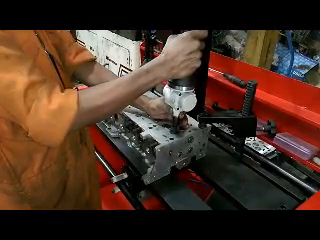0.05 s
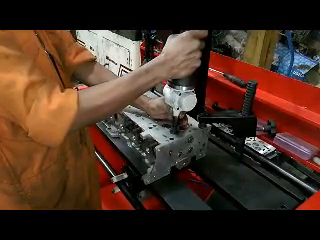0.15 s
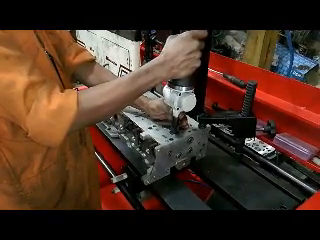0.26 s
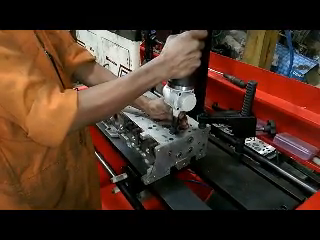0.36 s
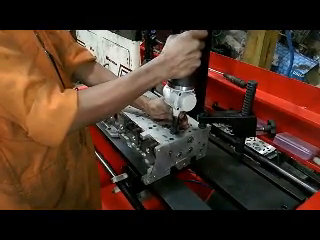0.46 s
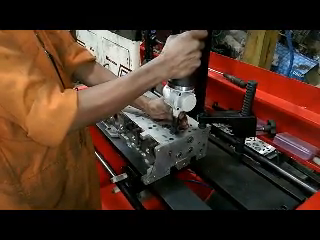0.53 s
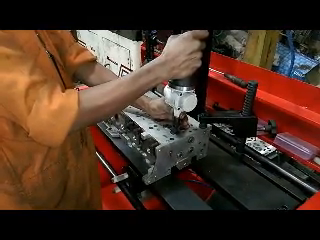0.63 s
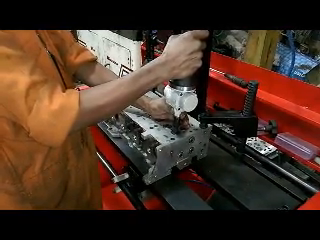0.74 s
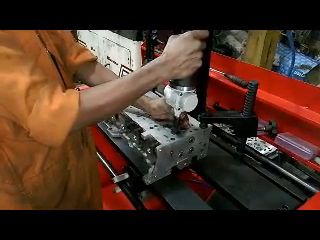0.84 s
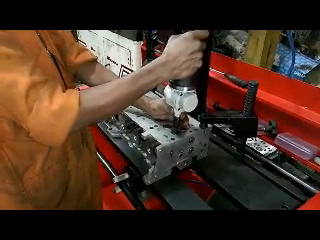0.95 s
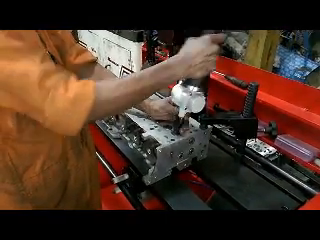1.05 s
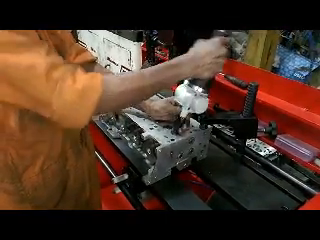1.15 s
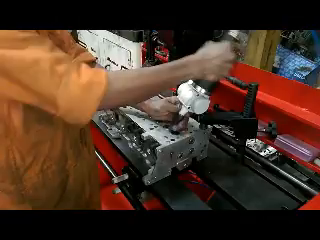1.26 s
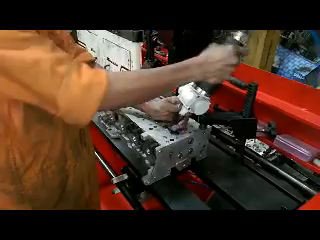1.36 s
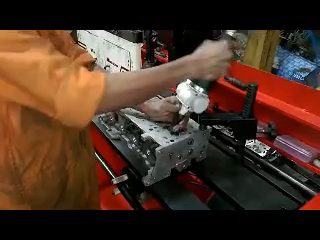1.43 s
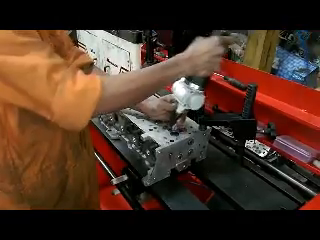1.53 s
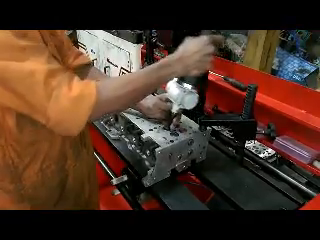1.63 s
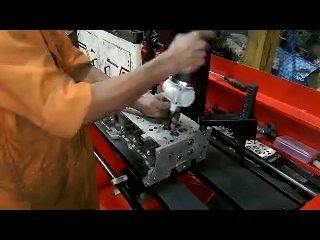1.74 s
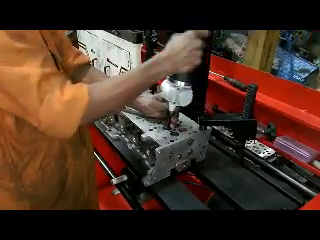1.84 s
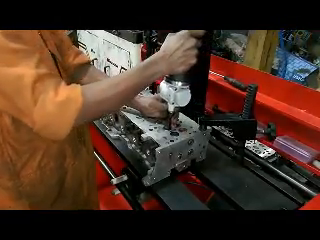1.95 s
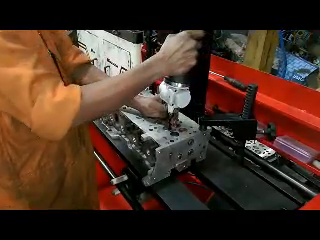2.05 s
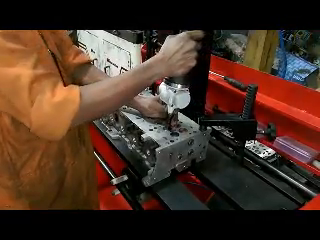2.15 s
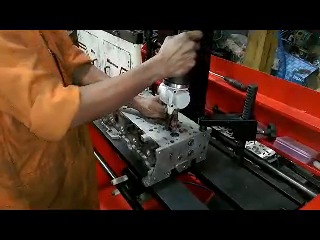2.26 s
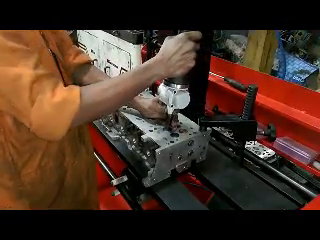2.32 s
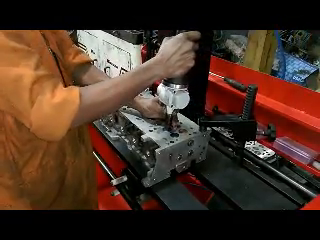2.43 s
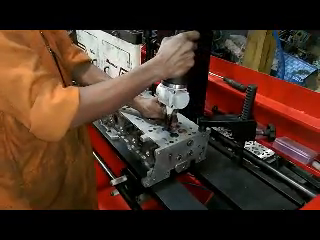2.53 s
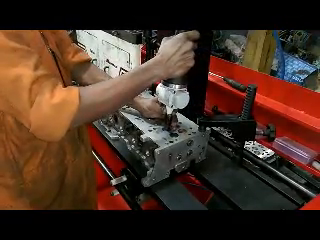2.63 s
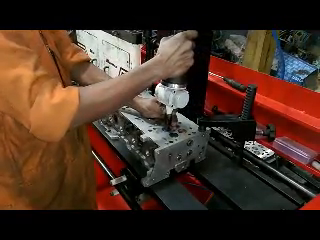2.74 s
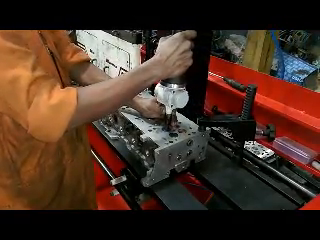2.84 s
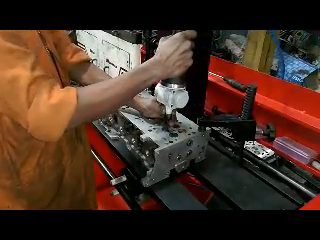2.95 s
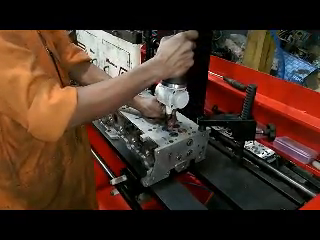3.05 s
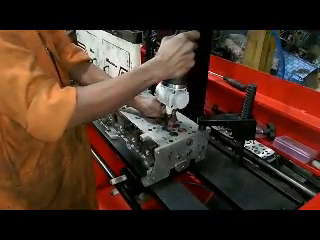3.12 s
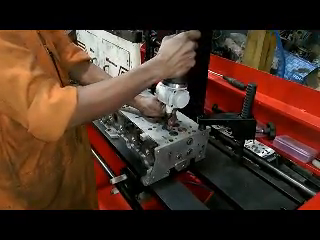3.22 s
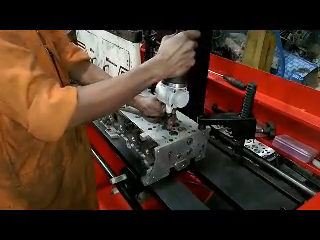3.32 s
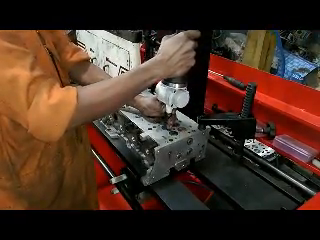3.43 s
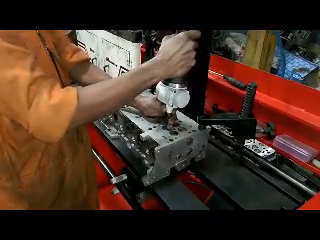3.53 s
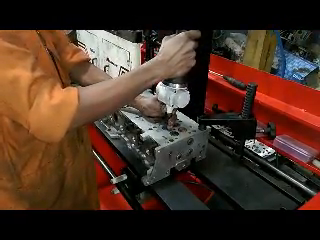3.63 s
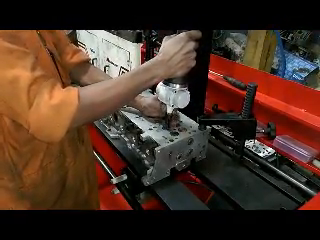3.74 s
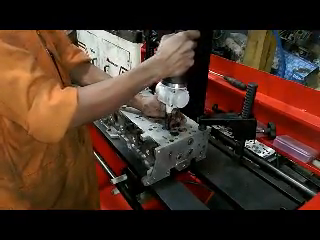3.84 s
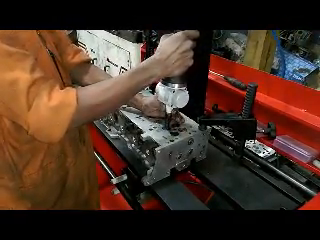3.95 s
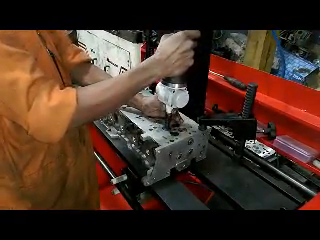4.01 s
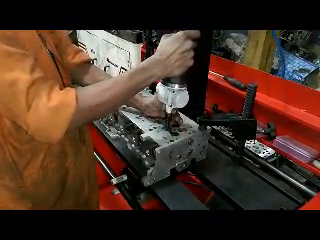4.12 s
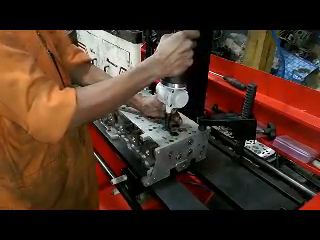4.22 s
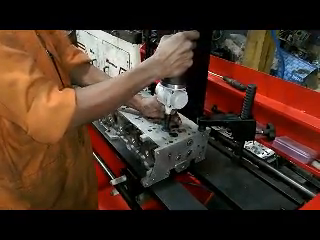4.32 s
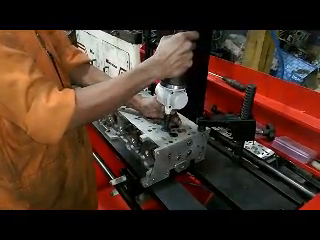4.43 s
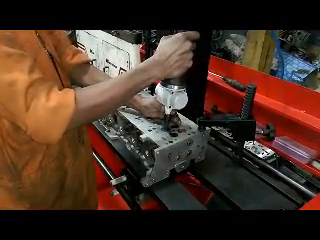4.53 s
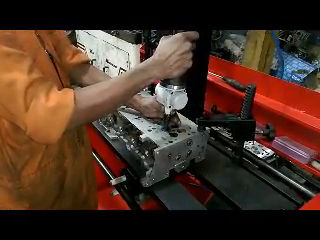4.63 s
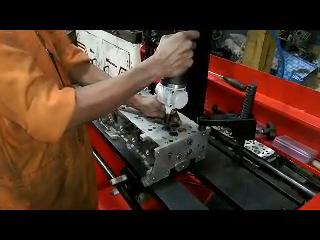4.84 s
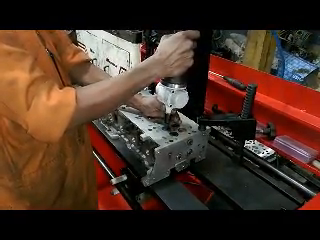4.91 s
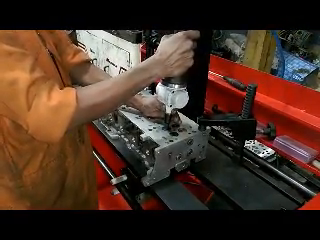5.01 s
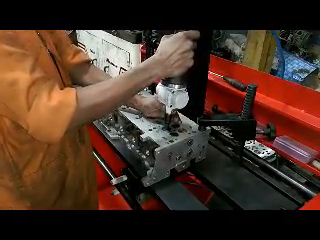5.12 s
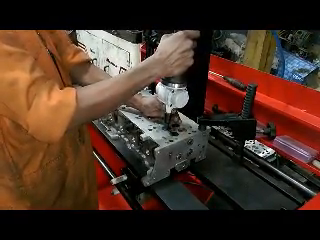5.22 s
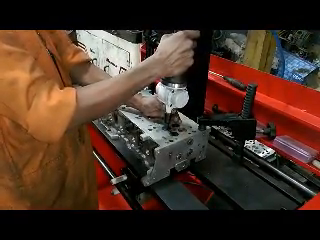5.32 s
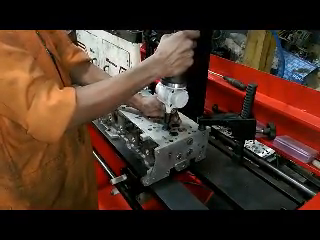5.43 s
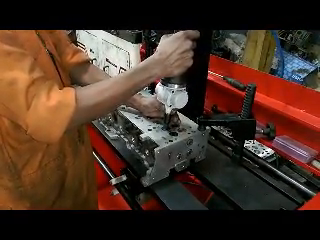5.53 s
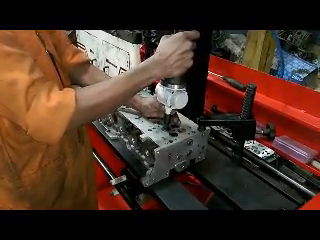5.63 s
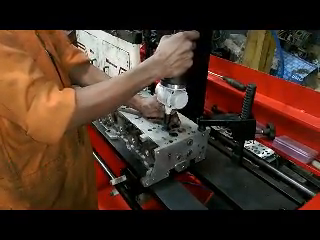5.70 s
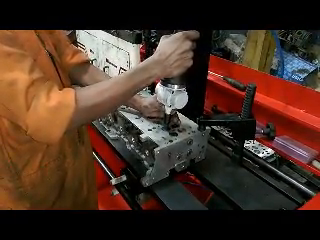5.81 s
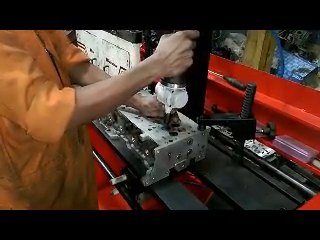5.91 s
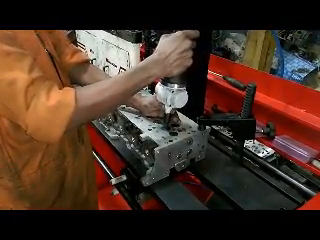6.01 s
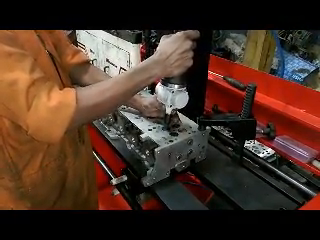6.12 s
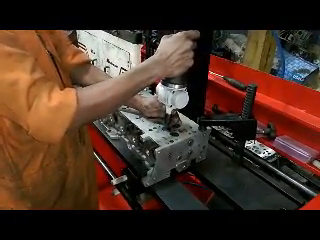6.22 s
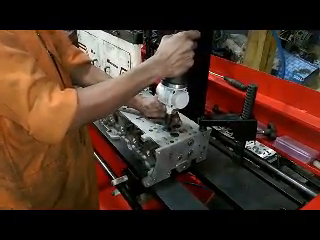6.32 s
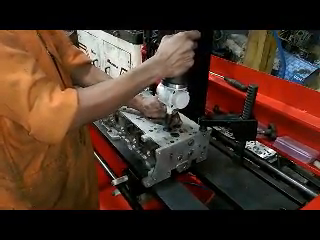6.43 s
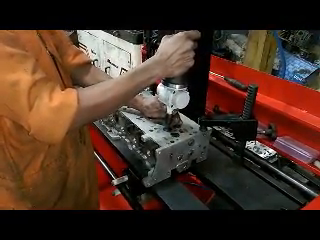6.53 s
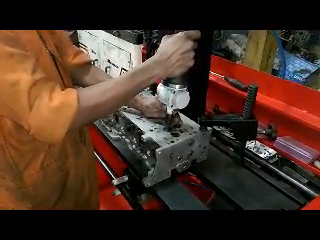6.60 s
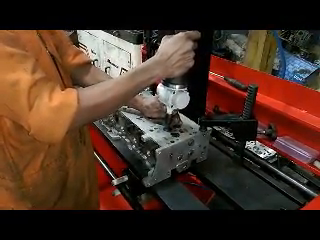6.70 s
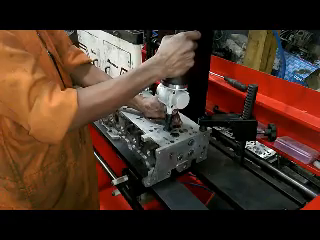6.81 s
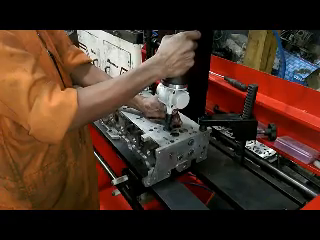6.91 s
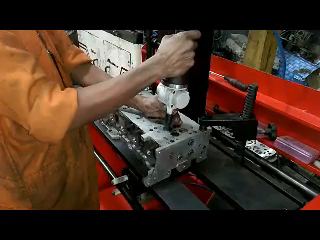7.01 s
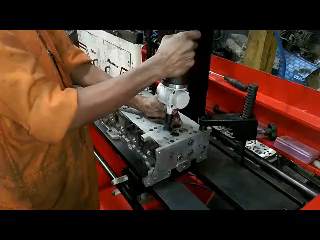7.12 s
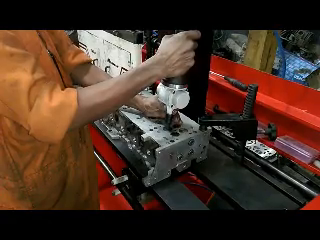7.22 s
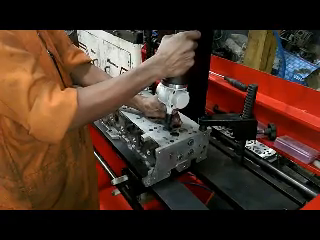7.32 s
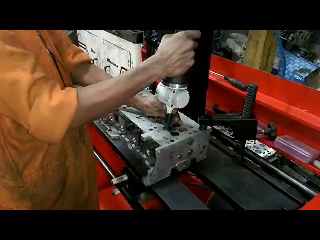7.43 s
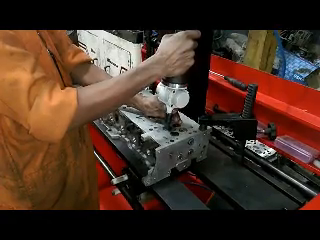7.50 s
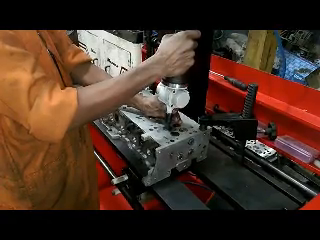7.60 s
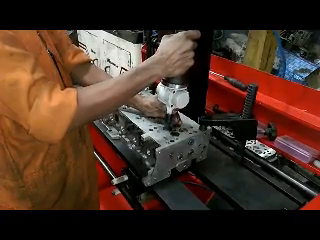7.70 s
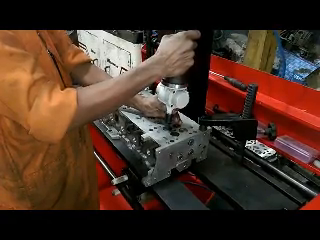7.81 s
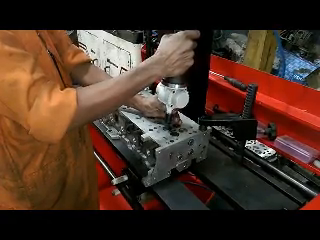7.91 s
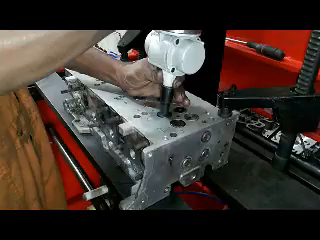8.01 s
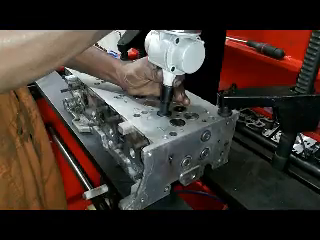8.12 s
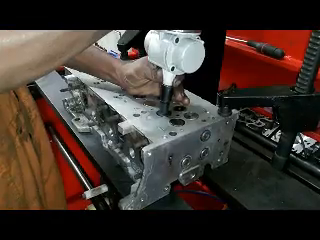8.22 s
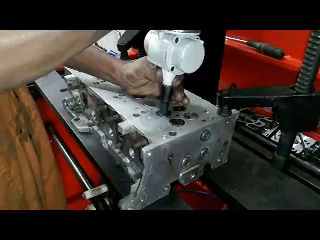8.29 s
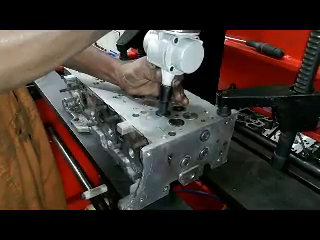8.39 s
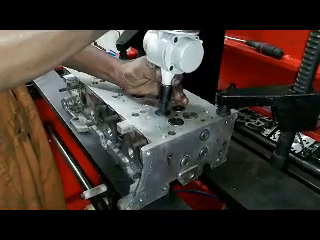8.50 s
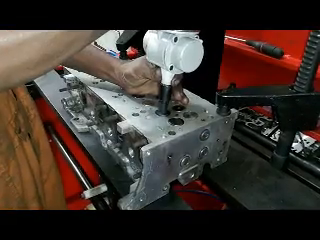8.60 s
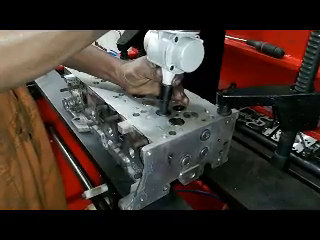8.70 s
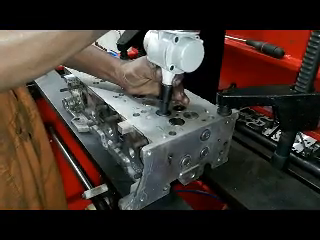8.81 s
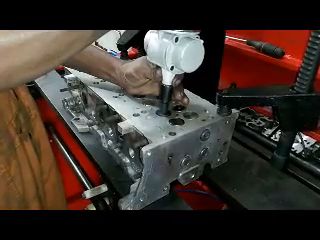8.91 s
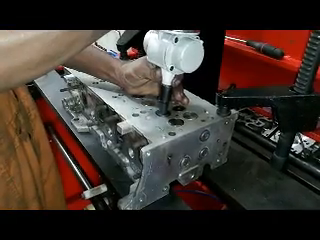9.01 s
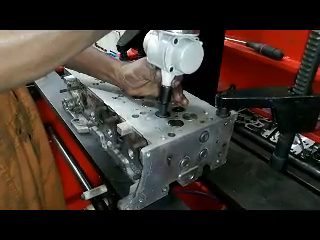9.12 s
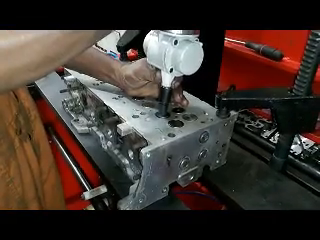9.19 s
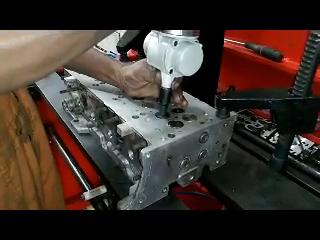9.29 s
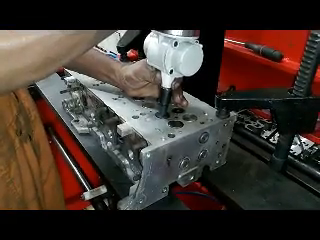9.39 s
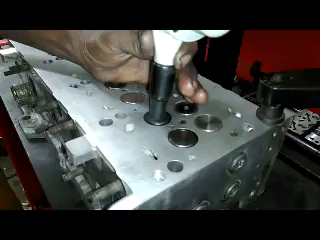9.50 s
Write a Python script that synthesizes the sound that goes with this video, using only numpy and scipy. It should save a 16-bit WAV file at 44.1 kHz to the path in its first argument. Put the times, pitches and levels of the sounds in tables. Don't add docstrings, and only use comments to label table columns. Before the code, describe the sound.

In a workshop, a motor tool rocks a valve on its seat with rapid, ringing metal rattle and gritty grinding. It soon stops; a switch clicks close by and sheet metal clatters in the distance over fan noise and motor hum. Low draughts flutter on the microphone as the tool starts again about an arm's length away, running to the end with a closer, slightly changed ring.

```python
import sys
import numpy as np
from scipy import signal
from scipy.fft import rfft, irfft, next_fast_len
from scipy.io import wavfile
from scipy.ndimage import uniform_filter1d

SR = 44100
rng = np.random.default_rng(int(sys.argv[2]) if len(sys.argv) > 2 else 0)


def wrap_up_sound(samples):
    columns = np.atleast_2d(samples).T
    tamed = np.clip(columns, -1, 1)
    steps = np.round(tamed * 32767).astype(np.int16)
    wavfile.write(sys.argv[1], SR, steps)


def linear_from_db(decibels):
    return 10 ** (np.asarray(decibels, float) / 20)


N = 421155
TIME = np.arange(N) / SR
MOTOR_START_S = 4.41
PASTE_BITES_S = 0.089


def level(x, db):
    return x * linear_from_db(db) / np.sqrt(np.mean(x ** 2))


def colour(x, points):
    size = next_fast_len(x.shape[-1])
    hz, db = np.transpose(points)
    log_hz = np.log(np.fft.rfftfreq(size, 1 / SR) + 1)
    gain = linear_from_db(np.interp(log_hz, np.log(hz), db, left=-80, right=-80))
    return irfft(rfft(x, size) * gain, size)[..., :x.shape[-1]]


def walk(rate):
    k = int(SR / rate)
    held = np.repeat(rng.standard_normal(N // k + 1), k)
    return 1.63 * uniform_filter1d(uniform_filter1d(held, k), k)[:N]


def pair(alike_hz, size=N):
    mid, side = rng.standard_normal((2, size))
    side = signal.lfilter(*signal.butter(1, alike_hz, "high", fs=SR), side)
    return mid + np.array([side, -side])


def modes(hz, width_hz, size):
    t = np.arange(size) / SR
    decay = np.exp(-np.pi * np.c_[width_hz] * t)
    return np.c_[width_hz] / 1000 * decay * np.sin(2 * np.pi * np.c_[hz] * t)


def struck(table, t):
    return sum(linear_from_db(db) * np.exp(-np.pi * w * t) * np.sin(2 * np.pi * hz * t) for hz, w, db in table)


def add(out, sound, s):
    i = max(int(round(s * SR)), 0)
    out[..., i:i + sound.shape[-1]] += sound[..., :N - i]


# pitch [Hz], level [dB per Hz]
SHOP_COLOUR = [(20, -12), (40, -12.5), (80, -3), (190, -10), (380, -10), (500, -14.5), (640, -8.5),
               (1200, -11.5), (1600, -7.5), (2100, -8), (3000, -13.5), (4500, -21), (8000, -28.5),
               (15800, -43)]
# pitch [Hz], level [dB]
HUM = [(86, -69), (301.5, -74), (377, -69.5), (441.4, -74), (630, -67), (694.4, -68), (759, -72),
       (1012, -68.5), (1109, -74)]
# pitch [Hz], start [s], end [s], level [dB]
WHISTLE = (3268, 3.15, 3.62, -65.5)


def shop():
    noise = 0
    for hz in 45 * 4. ** np.arange(5):
        octave = [(hz / 4, -40), (hz / 2, -3), (hz / 1.5, 0), (hz * 1.5, 0), (hz * 2, -3), (hz * 4, -40)]
        noise = noise + colour(pair(680.0), octave) * linear_from_db(.25 * walk(2.45) + 0.7 * walk(12))
    fan = signal.lfilter(*signal.butter(2, 1300, "high", fs=SR), rng.standard_normal(N)) * linear_from_db(-5)
    noise = noise + np.array([fan, np.roll(fan, 18)])
    lines = sum(linear_from_db(db + 1.2 * walk(8)) * np.sin(2 * np.pi * (hz * TIME + rng.random())) for hz, db in HUM)
    hz, start, end, db = WHISTLE
    swell = np.sin(np.pi * np.clip((TIME - start) / (end - start), 0, 1))
    lines = lines + linear_from_db(db) * swell * np.sin(2 * np.pi * hz * TIME)
    return level(colour(noise, SHOP_COLOUR), -50.5) + linear_from_db(1.5) * lines


# start [s], end [s], left level [dB], right level [dB]
GUSTS = [
    (4.206, 4.505, -51.5, -59),
    (4.5, 5.15, -57.5, -58),
    (5.162, 5.682, -47.5, -62),
    (5.726, 6.19, -50, -65),
    (6.297, 7.16, -66, -65),
    (7.197, 7.454, -51, -63),
    (7.455, 7.934, -61, -57),
]
# centre [s], left level [dB], length [ms], right level [dB], throb [Hz]
POPS = [(4.21, -55, 24, -58, 70), (4.275, -44, 30, -44, 100), (4.325, -40, 25, -50, 90),
        (4.378, -26.5, 17, -50, 156), (4.41, -38, 18, -56, 60), (4.454, -45, 25, -60, 130),
        (4.544, -47, 39, -62, 70), (4.673, -50, 35, -47, 151), (5.035, -36.5, 20, -56, 90),
        (5.2, -55, 31, -59, 60), (5.273, -45, 22, -59, 141), (5.405, -39, 26, -62, 110),
        (5.485, -34, 28, -58, 80), (5.525, -36.5, 36, -58, 150), (5.588, -48, 30, -58, 100),
        (5.635, -46, 18, -58, 151), (5.738, -46, 27, -59, 100), (5.95, -50, 20, -60, 70),
        (6.059, -35.5, 27, -59, 100), (6.092, -45, 15, -59, 140), (6.846, -56, 22, -59, 80),
        (6.927, -55, 44, -53, 80), (7.327, -37, 29, -60, 65), (7.409, -44, 45, -60, 100),
        (7.487, -47, 30, -58, 90), (7.616, -40, 32, -59, 151), (7.763, -50, 36, -57, 90)]


def draught():
    gusts = sum(np.c_[linear_from_db(db)] * ((TIME > a) & (TIME < b)) for a, b, *db in GUSTS)
    gusts = uniform_filter1d(gusts, int(0.11 * SR))
    rumble = [(25, -13), (45, -2.0), (100, -3.0), (180, -8), (350, -16), (700, -51)]
    eddies = level(colour(rng.standard_normal((2, N)), rumble), 0)
    out = eddies * gusts * linear_from_db([3.9 * walk(25), 2.5 * walk(20)])
    for s, left_db, ms, right_db, hz in POPS:
        at, half = int(s * SR), int(ms * SR / 1000)
        throb = linear_from_db(-2) * np.cos(2 * np.pi * hz * (TIME[:2 * half] - half / SR))
        pop = (eddies[:, at - half:at + half] + throb) * np.hanning(2 * half)
        gain = linear_from_db(np.c_[[left_db - 3.0, right_db - 8.0]])
        out[:, at - half:at + half] += pop / pop.std(axis=1)[:, None] * gain
    return out


# start [s], peak [dB], colour centre [Hz], t60 [s], drum level [dB]
CLATTER = [(1.293, -38.5, 2060, 0.36, -75), (1.322, -37, 1850, 0.43, -65), (1.334, -32.5, 1200, 0.11, -75),
           (1.346, -57, 1300, 0.14, -55), (1.362, -46, 900, 0.27, -62), (1.484, -39, 2020, 0.24, -58),
           (1.492, -50, 1820, 0.79, -76), (1.630, -28, 2320, 0.24, -36), (1.668, -48, 1900, 0.98, -65),
           (1.788, -36.5, 1750, 0.62, -37), (1.808, -33.5, 1400, 0.13, -37), (1.828, -50, 1100, 0.15, -67),
           (1.871, -33.5, 1100, 0.32, -50), (1.910, -36, 1700, 0.34, -60),
           (1.945, -40.5, 2200, 0.14, -49.5), (2.012, -44, 1800, 0.33, -56)]
# [dB, dB, dB, dB]
SHEET = [(554, 12, -8, 3, -8, 3.5), (790, 21, 5.5, 1, 0, 8), (896, 16, -8, -10, 8, -5),
         (1044, 12, -13, -15, 15, -7), (1189, 14, 7, 4, -4, 5), (1330, 21, -11, 3, 2, -2),
         (1576, 24, 1, -17, 6, -4), (1774, 29, 0, -5, -8, 0), (1930, 34, 2, 5, -4, 4.5),
         (2060, 49, 0, 3, 3, 1), (2310, 74, -1, 3.5, 3, -3), (2810, 79, -4, -2, -5, -4),
         (3080, 30, -4, -2, -6, -2), (3600, 1800, -8, -7, -7, -13)]
BOUTS_S = [1.6, 1.75, 1.86]
# pitch [Hz], width [Hz], level [dB]
DRUM = [(293, 5, -5), (333, 6, 4)]


def clatter():
    out, t = np.zeros((2, N)), np.arange(14000) / SR
    hz, width, *bouts_db = np.transpose(SHEET)
    for s, peak_db, centre_hz, t60, drum_db in CLATTER:
        smear = pair(900, len(t)) * linear_from_db(-60 * t / t60) * np.minimum(t / 0.00056, 1)
        db = bouts_db[np.searchsorted(BOUTS_S, s)]
        bright_db = 2.5 * max(peak_db + 32.5, 0)
        broad = [(150, -20), (250, -10), (centre_hz / 2, -6), (centre_hz, 0), (2.65 * centre_hz, -8),
                 (4600, -13), (9000, -23.5 + bright_db), (15000, -51 + bright_db)]
        ring = linear_from_db(db + 1.5 * rng.standard_normal(len(hz))) @ modes(hz, width + 4, size=3000)
        rung = signal.fftconvolve(smear, ring[None], axes=1)[:, :len(t)]
        sound = colour(smear / np.std(smear) + linear_from_db(-1.5) * rung / np.std(rung), broad)
        add(out, sound * linear_from_db(peak_db) / np.std(sound[:, :600]), s)
        add(out, linear_from_db(drum_db) * struck(DRUM, t) * np.minimum(t / 0.055, 1), s)
    return out


# pitch [Hz], width [Hz], level [dB]
SWITCH = [(1100, 450, -20), (2650, 340, -21), (3500, 510, -15.5), (6800, 590, -15.5), (7800, 1200, -33)]


def switch():
    out, t = np.zeros((2, N)), np.arange(8000) / SR
    snap = struck(SWITCH, t) * np.minimum(t / 0.00038, 1)
    bright = [(4500, -20), (6200, 3), (7500, 8), (9000, -12), (11000, -32)]
    tail = colour(rng.standard_normal((2, len(t))), bright)
    add(out, snap + linear_from_db(-41.5) * linear_from_db(-60 * t / 0.39) * tail, 1.3708)
    return out


# time [s], level [dB]
THRUM = [(0, -63.5), (1.2, -62.5), (7.9, -67.5), (8.1, -63.5), (8.6, -60.5), (9.55, -55.5)]


def bench_thrum():
    low = [(90, -15), (150, 2.0), (230, -5.0), (330, -8)]
    return level(colour(pair(510.0), low), 0) * linear_from_db(np.interp(TIME, *np.transpose(THRUM)))


# pitch [Hz], level [dB per Hz]
GRIND = [(150, -32), (250, -12), (386, -7), (476, -14), (651, -11.5), (971, -4), (1640, -3.5), (2130, -4),
         (2910, -3), (3230, -1.5), (4260, -11), (13400, -27.5), (16000, -30)]


def paste():
    grit = (rng.random(N) < 70 / SR) * rng.exponential(size=N)
    grit = signal.lfilter([1], [1, -.985], grit)
    rub = pair(810.0) * (linear_from_db(1.83 * walk(90)) + linear_from_db(-11.0) * grit)
    since = TIME - MOTOR_START_S
    bite = np.where(since > -.1, 1 - 0.64 * np.exp(-np.maximum(since, 0) / PASTE_BITES_S), 1)
    return level(colour(rub, GRIND), -38) * bite


# time [s], position [crank turns]
CRANK = [
    [(0.0165, -.5), (0.2491, 3), (1.1653, 17)],
    [(4.4160, -.5), (4.5292, 1), (4.5981, 2), (5.0316, 8.5), (6.0169, 23.5), (6.4796, 30.5), (6.5817, 32),
     (6.9099, 37), (7.6611, 48.5), (7.9583, 53)],
    [(7.9762, -.5), (8.0167, 0), (8.8344, 12.5), (9.1922, 18), (9.523, 23)],
]
# forward late [ms], back late [ms], forward blow [dB], back blow [dB]
STROKES = [
    (0.0, -.6, -22.5, -24),
    (-.5, .75, -23.5, -25),
    (-0.59, 1.7, -22.5, -24.5),
]


def strokes(back):
    events = []
    for crank, (*late_ms, forward_db, back_db) in zip(CRANK, STROKES):
        s, turns = np.transpose(crank)
        at = np.interp(np.arange(turns[-1] + 1) - back / 2, turns, s)
        late_chance, blow_chance = rng.standard_normal((2, len(at)))
        db = (forward_db, back_db)[back] - 4 * (abs(at - 7.97) < .02) + .7 * blow_chance
        events += zip(at + (late_ms[back] + .3 * late_chance) / 1000, db)
    return events


# time from the main contact [ms], cylinder head level [dB], tool housing level [dB]
FORWARD_TRAIN = [
    [(-2, -3, -15), (0.42, 5.5, 1), (1.55, -9, -7), (3, -4.5, -7.5), (5.5, -3.5, -14), (10, -22, -23),
     (12, -17, -13.5)],
    [(-3.5, -6.5, -22), (-0.06, 4, -2), (1.13, -12, -1), (4, -4.5, -8), (5.5, -4, -12), (7, -7, -19),
     (11.5, -16, -19.5)],
    [(-1.5, -3.5, -21), (0.17, 1.5, -3.5), (1.7, -5.5, -3.5), (4, -6.5, -3), (5.5, -5, -21), (6, -3.5, -13),
     (5, -19, -34)],
]
BACK_TRAIN = [
    [(-1.5, -4.5, -12), (0.6, 3.5, -3), (1.2, -14, -1.5), (3.5, 0.5, -2.5), (5, -7, -14), (6.5, -9, -11),
     (10.5, -10, -6)],
    [(-2.3, -4.5, -8), (0.63, 5, -3), (0.8, -16, -17), (1.5, -1.5, -2.5), (4.5, -36, -4), (8, -16, -7.5),
     (10, -13.5, -11)],
    [(-2, 0, -4.5), (0, 4.5, -2), (2.5, -8, -2.5), (4, -3, -2), (4, -14, -11.5), (11, -24, -21),
     (5.5, -5, -18)],
]
# pitch [Hz], width [Hz], forward level [dB], back level [dB], left minus right [dB]
FIRST_RING = [(395, 57, -4, -2.5, -5.5), (685, 95, 6, -2, -0.5), (785, 55, -7, 0.5, -4),
              (866, 72, 0, -0.5, 1), (1047, 53, -4, -3, 5), (1167, 130, 2, 3.5, -2),
              (1525, 260, -2, -1.5, 2.5), (1860, 190, -0.5, 0.5, 7), (2444, 420, 2.5, 5.5, 8),
              (3196, 95, 8, 0, 22.5), (3700, 480, -2.5, -4.5, -11), (4570, 430, -14.5, -27, -10),
              (5700, 840, -23, -7.5, -16)]
SECOND_RING = [(396, 68, -3.5, -0.5, -6), (681, 84, 7, -5.5, 2), (767, 73, 2.5, 4, -3),
               (888, 55, 0, 2, -0.5), (1049, 55, 3.5, 0.5, 5), (1245, 210, -1.5, -1.5, -11.5),
               (1492, 220, 0, 5, 3), (1690, 246, 7.5, 5.5, 4.5), (1890, 420, 3, 4, 0),
               (2477, 520, 4.5, 3.5, 11), (3254, 225, 7.5, 1.5, 19.5), (4060, 340, -1, -0.5, -2),
               (4450, 590, -18, -41, -27), (5520, 1100, -4.5, -5, -14)]
CLOSE_RING = [(485, 180, -4.5, 3, 2), (626, 95, 5.5, 0.5, -0.5), (768, 115, -3, -1, -7),
              (884, 77, 4.5, 7, -5), (1100, 80, -3, 1, -15), (1300, 400, 7, 7, -0.5),
              (1700, 480, 4.5, -1, 0), (1900, 360, 7.5, 2.5, 5.5), (2320, 590, -6.5, -4.5, 28.5),
              (3214, 280, 10, 1.5, 17.5), (3342, 380, 13, 8.5, 2), (4070, 270, -3, -9.5, -15),
              (5620, 550, -9, -15, 7)]
# start [s], right port lag [ms], resonances heard from there
STANDPOINTS = [
    (0, 0.025, FIRST_RING),
    (4.3, 0.09, SECOND_RING),
    (7.97, 0.18, CLOSE_RING),
]
# forward [ms], back [ms]
HEAVY_LEAD_MS = [
    (0.83, 2.04),
    (0.87, 2.06),
    (0.66, 0.89),
]


def reversals(events, train, back, trim_db):
    out, blows = np.zeros((2, N)), np.zeros(N)
    head_lead = 35
    size = 900
    build_up = 1 - np.exp(-TIME[:size] / 0.00061)
    for s, db in events:
        place = sum(p[0] <= s for p in STANDPOINTS) - 1
        _, lag_ms, table = STANDPOINTS[place]
        ms, head_db, housing_db = np.transpose(train[place])
        hz, width, *gains_db, pan_db = np.transpose(table)
        housing, heavy = hz > 2200, hz < 1150
        chance = rng.standard_normal((4, 16))
        pan = np.array([pan_db, -pan_db]) / 2
        gain = linear_from_db(gains_db[back] + db + trim_db + 1.0 * chance[0, :len(hz)] + pan)
        if s > MOTOR_START_S:
            gain = gain * linear_from_db(np.where(housing, 5, -2) * np.exp((MOTOR_START_S - s) / 0.17))
        seated_hz = hz * (1 + .006 * chance[0, -1] * (hz > 1150))
        sense = np.where(heavy, 1, (-1) ** np.arange(len(hz)))
        rings = modes(seated_hz, width, size) * np.c_[sense] * build_up
        for port, push in enumerate((gain * heavy) @ rings * linear_from_db(4)):
            add(out[port], push, s + (port * lag_ms - HEAVY_LEAD_MS[place][back]) / 1000)
        head = (gain * (~housing & ~heavy)) @ rings
        shell = (gain * housing) @ rings
        shell = np.pad(shell, ((0, 0), (head_lead, 0)))[:, :-head_lead]
        for k in range(len(ms)):
            at = s - head_lead / SR + (ms[k] + .065 * chance[1, k]) / 1000
            sound = head * linear_from_db(head_db[k] + .6 * chance[2, k])
            sound = sound + shell * linear_from_db(housing_db[k] + .51 * chance[3, k])
            add(out[0], sound[0], at)
            add(out[1], sound[1], at + lag_ms / 1000)
        run_up_db = 1.5 * (MOTOR_START_S < s < MOTOR_START_S + 0.17)
        add(blows, linear_from_db([db + 1.3 * chance[1, -1] + run_up_db]), s - .006)
    return out, blows


# pitch [Hz], level [dB]
TICK = [(500, -36), (1200, 22), (2500, 24.5), (4500, 6.5), (8000, 4.5), (12000, 7.5), (15800, -6)]


def main_tick(blows, back_blows):
    recoil = back_blows - .7 * np.roll(back_blows, -14)
    tick = colour(blows + linear_from_db(-1.0) * recoil, TICK)
    return np.array([np.roll(tick, 265), np.roll(tick, 272)])


# pitch [Hz], width [Hz], lift [dB]
GLINT = [(5500, 200, 3), (6250, 250, 2.5), (7310, 500, 3.5), (8880, 350, 4), (11100, 470, 3.5),
         (13700, 600, 2)]


def glint(x):
    size = next_fast_len(N)
    f = np.fft.rfftfreq(size, 1 / SR)
    lift_db = sum(db / (1 + (2 * (f - hz) / w) ** 2) for hz, w, db in GLINT)
    return irfft(rfft(x, size) * linear_from_db(lift_db), size)[..., :N]


# fizz level [dB], fizz decay [s], drag until the next stroke [dB]
FIZZ = [
    (-2, 0.0085, -32),
    (-2.5, 0.0076, -19),
]
# pitch [Hz], level [dB]
CRACK = [(3500, 5.5), (4500, 1), (6000, -4.5), (7500, -2.5), (9500, -6.5), (11500, -6), (14000, -10.5),
         (15800, -21)]


def chatter(blows, back_blows):
    t = np.arange(1800) / SR - .006
    swell = linear_from_db(-5) * np.exp(np.minimum(t, 0) / 0.003)
    rebound = linear_from_db(-9) * (t > .0027) * np.exp(-abs(t - .0027) / 0.0016)
    burst = 0
    for strengths, (fizz_db, fizz_s, drag_db) in zip((blows, back_blows), FIZZ):
        after = np.exp(-t / 0.00096) + rebound + linear_from_db(fizz_db) * np.exp(-t / fizz_s) + linear_from_db(drag_db)
        burst = burst + signal.fftconvolve(strengths, np.where(t < 0, swell, after))[:N]
    run_up = np.exp(-abs(TIME - MOTOR_START_S) / PASTE_BITES_S)
    burst = burst * linear_from_db(-4 * run_up * (burst < .3 * burst.max()))
    left, right = glint(colour(burst * pair(8000.0), CRACK)) * linear_from_db([[-5.5], [-6.5]])
    return np.array([left, np.roll(right, 6)])


def bench_echo(near):
    t = np.arange(9000) / SR
    walls = pair(1000.0)[:, :len(t)] * linear_from_db(-60 * t / 0.043) * (t > .004)
    return signal.fftconvolve(near.mean(axis=0)[None], walls, axes=1)[:, :N] * linear_from_db(-30.0)


# start [s], end [s]
RUNNING = [
    (0, 1.187),
    (4.41, 9.6),
]


def tool():
    forward, blows = reversals(strokes(back=0), FORWARD_TRAIN, back=0, trim_db=12.0)
    backward, back_blows = reversals(strokes(back=1), BACK_TRAIN, back=1, trim_db=12.5)
    near = forward + backward + linear_from_db(2.0) * main_tick(blows, back_blows) + chatter(blows, back_blows)
    no_bass = signal.butter(3, 470., "high", fs=SR, output="sos")
    sound = signal.sosfilt(no_bass, near + bench_echo(near)) + paste() + bench_thrum()
    on = sum((TIME > a) & (TIME < b) for a, b in RUNNING)
    return sound * uniform_filter1d(1. * on, size=130)


def scene():
    return shop() + draught() + clatter() + switch() + tool()


# start [s], length [ms], above [Hz]
TREBLE_GAPS = [(0.028, 15, 9500), (0.13, 18, 13500), (0.16, 14, 11500), (0.19, 10, 11500),
               (0.384, 12, 12500), (0.624, 9, 13000), (0.82, 10, 12000), (1.106, 21, 12000),
               (1.135, 14, 13000), (1.354, 14, 5400), (4.396, 14, 8000), (4.424, 24, 9500),
               (4.51, 14, 9000), (4.578, 10, 9500), (4.979, 13, 13000), (5.113, 11, 13000),
               (5.634, 20, 10500), (6.123, 14, 11500), (6.587, 24, 13500), (7.152, 14, 9000),
               (7.639, 16, 13500), (8.746, 14, 13500), (8.939, 10, 13000)]


def mute_treble(x):
    out = x.copy()
    for s, ms, hz in TREBLE_GAPS:
        a, n = int(s * SR), int(ms * SR / 1000)
        highpass = signal.butter(6, hz, "high", fs=SR, output="sos")
        top = signal.sosfiltfilt(highpass, x[:, a - 200:a + n + 200])
        out[:, a:a + n] -= top[:, 200:-200] * signal.windows.tukey(n, .25)
    return out


def top_cut(x):
    return signal.sosfilt(signal.butter(12, 16490, fs=SR, output="sos"), x)


def record(dry):
    rounded = 0.33 * np.tanh(dry / 0.33)
    cut = signal.sosfilt(signal.ellip(8, .2, 60, 15740, fs=SR, output="sos"), rounded)
    return top_cut(mute_treble(cut))


dry = scene()
out = record(dry)
wrap_up_sound(out)
```